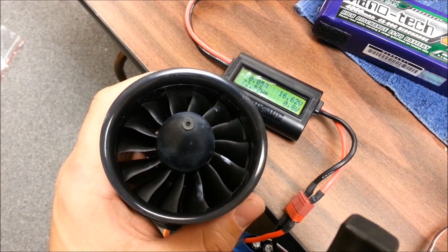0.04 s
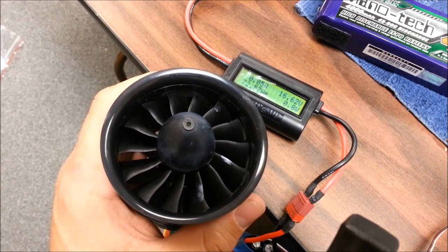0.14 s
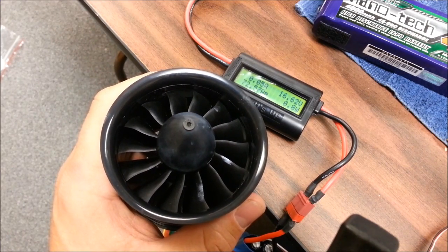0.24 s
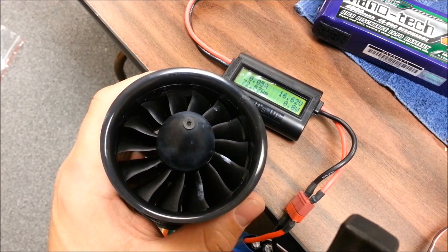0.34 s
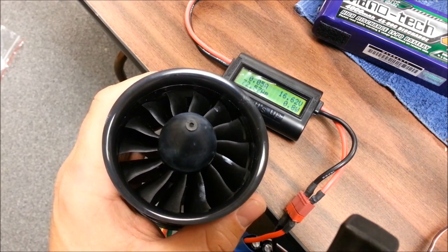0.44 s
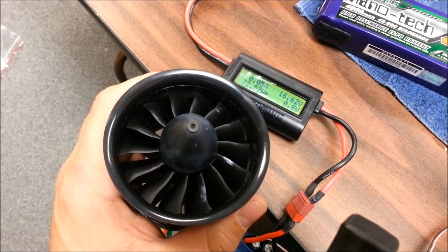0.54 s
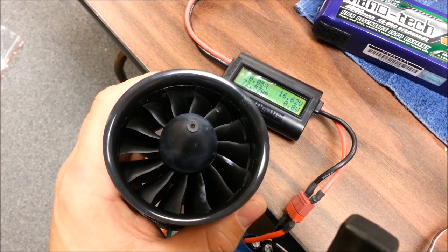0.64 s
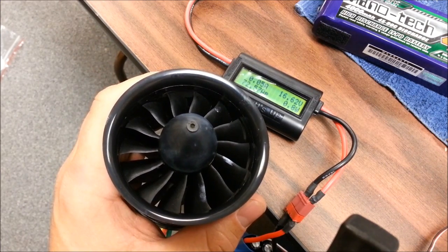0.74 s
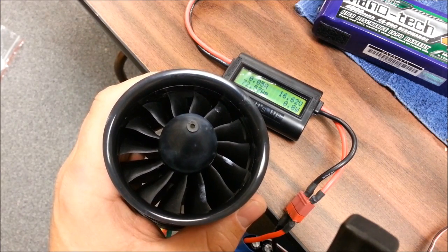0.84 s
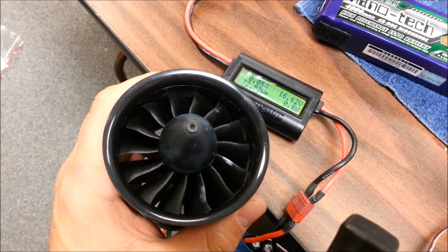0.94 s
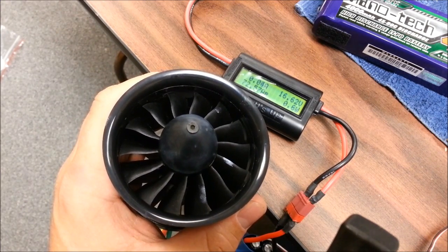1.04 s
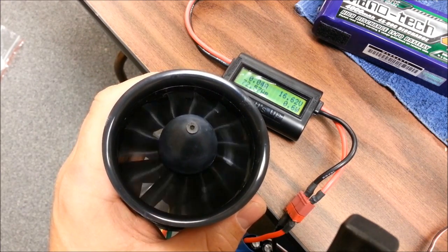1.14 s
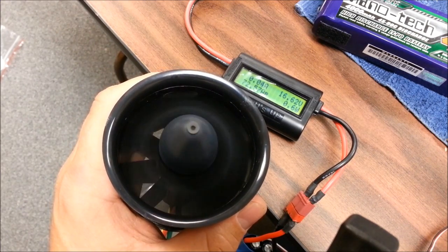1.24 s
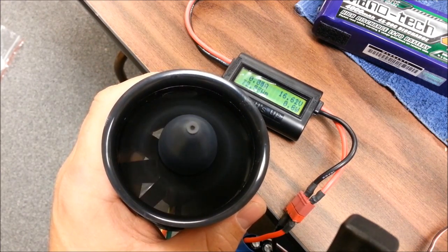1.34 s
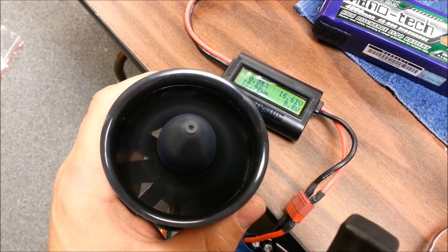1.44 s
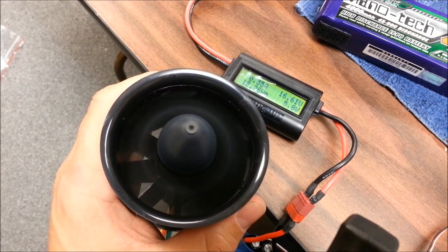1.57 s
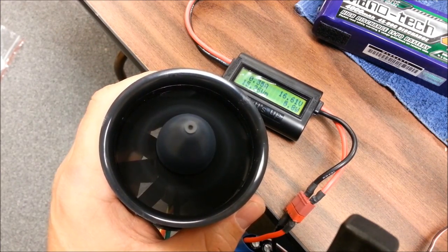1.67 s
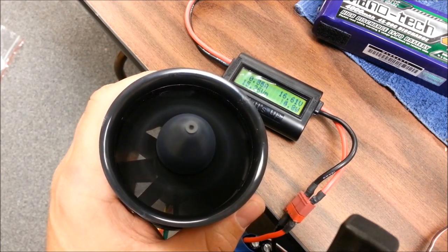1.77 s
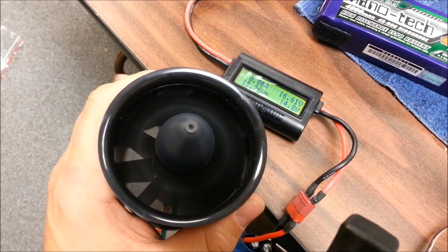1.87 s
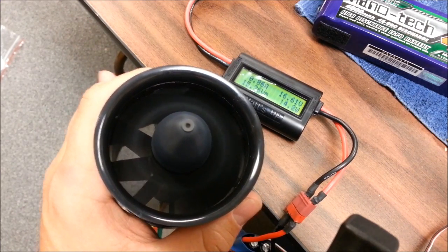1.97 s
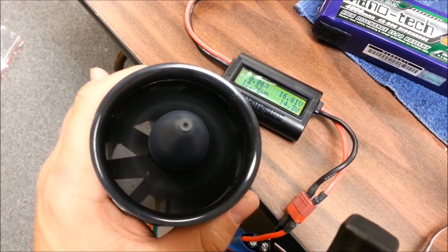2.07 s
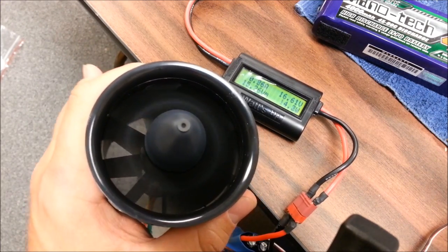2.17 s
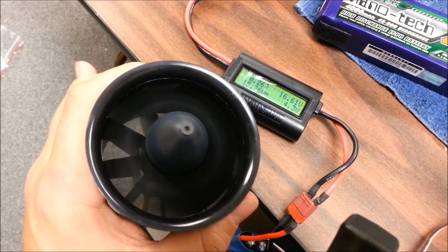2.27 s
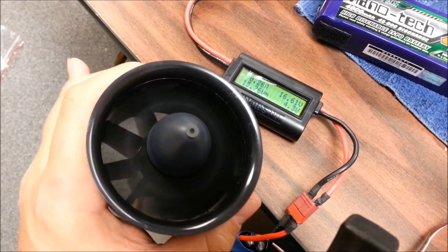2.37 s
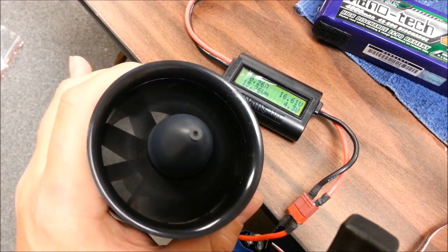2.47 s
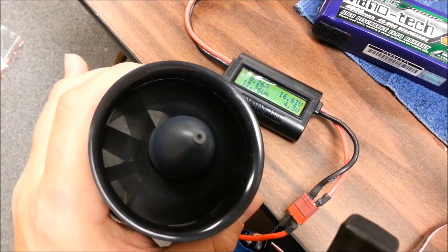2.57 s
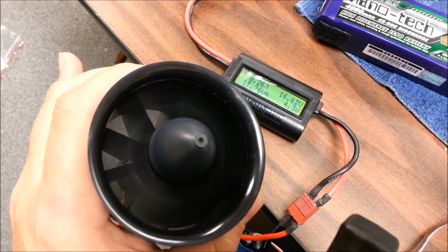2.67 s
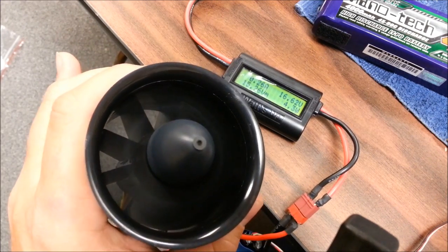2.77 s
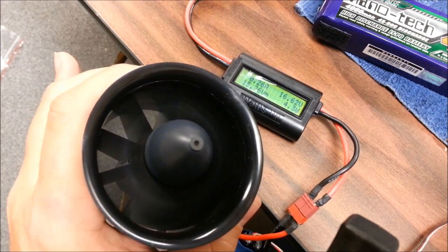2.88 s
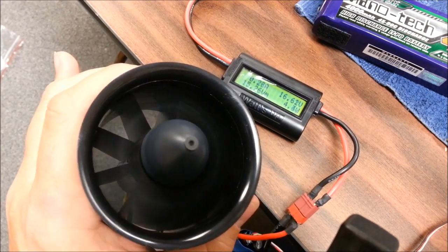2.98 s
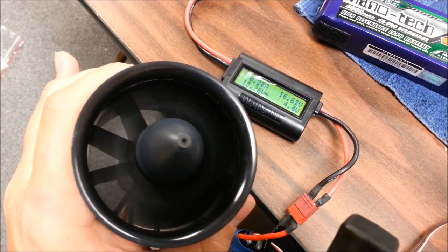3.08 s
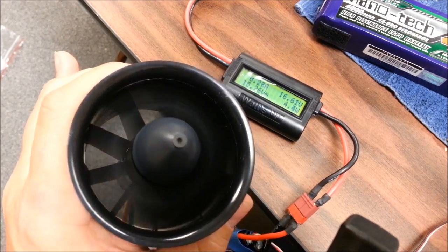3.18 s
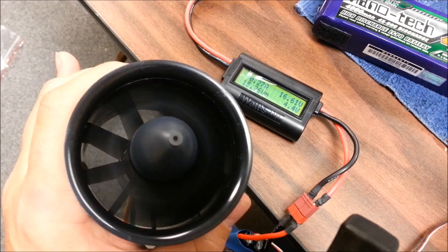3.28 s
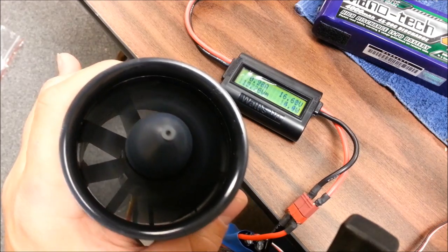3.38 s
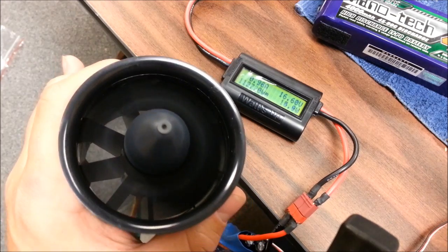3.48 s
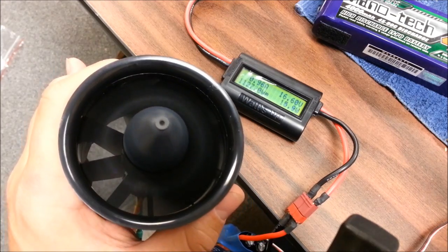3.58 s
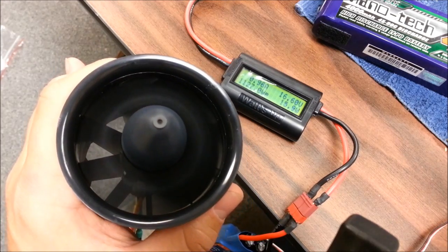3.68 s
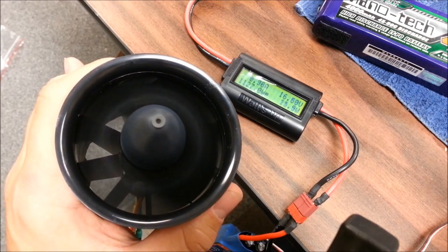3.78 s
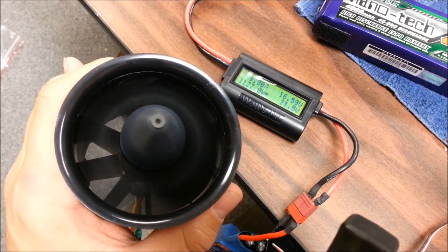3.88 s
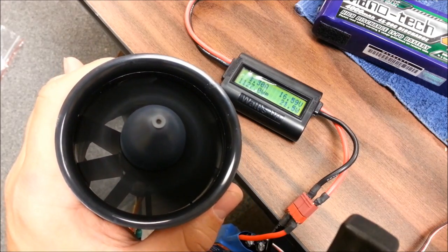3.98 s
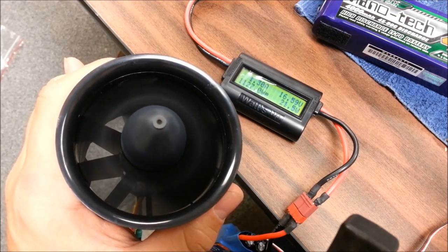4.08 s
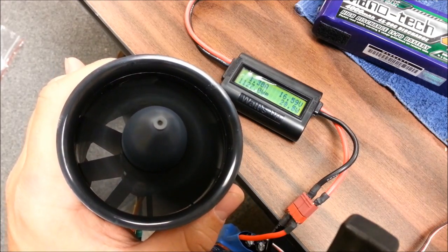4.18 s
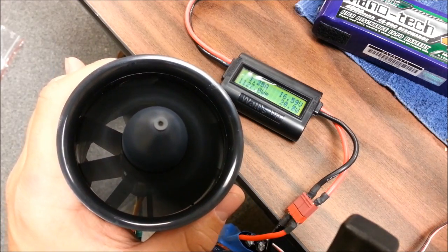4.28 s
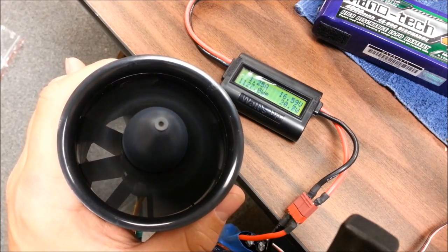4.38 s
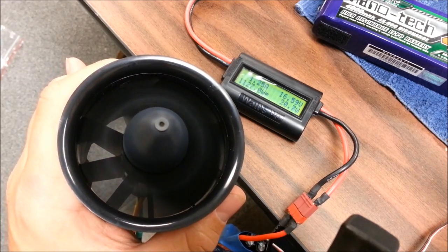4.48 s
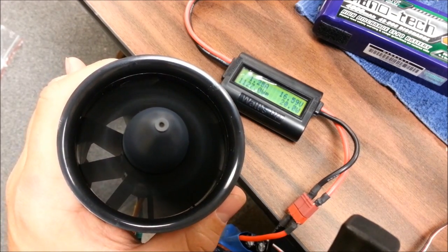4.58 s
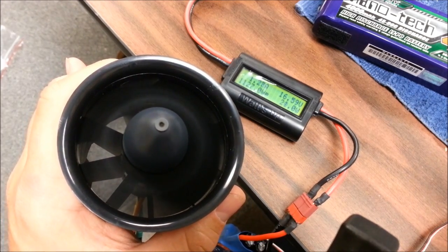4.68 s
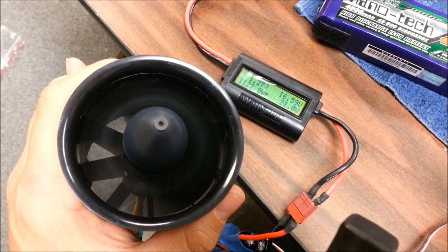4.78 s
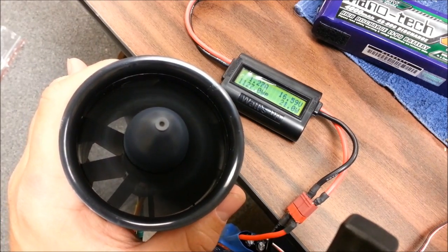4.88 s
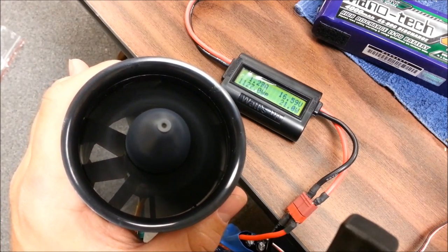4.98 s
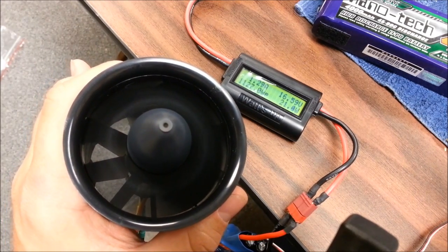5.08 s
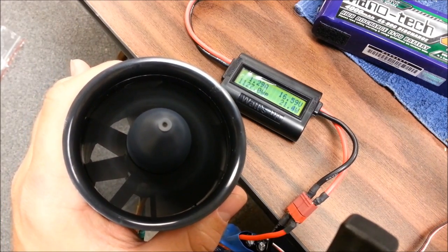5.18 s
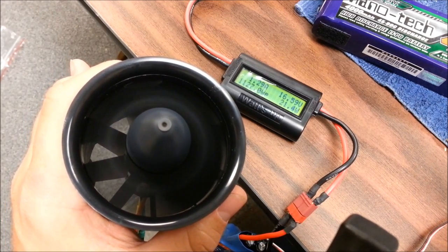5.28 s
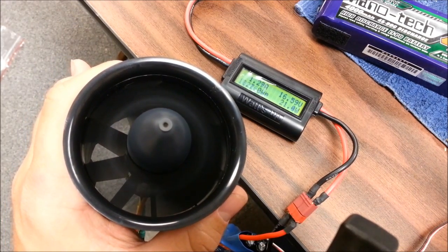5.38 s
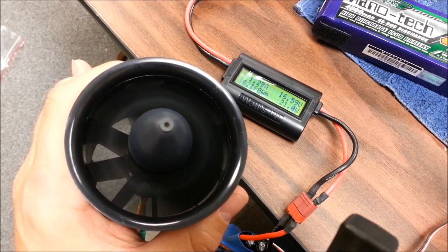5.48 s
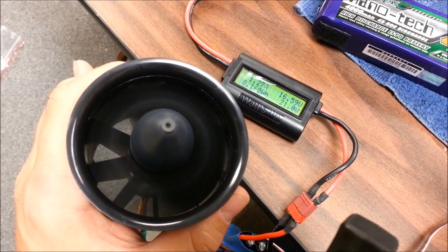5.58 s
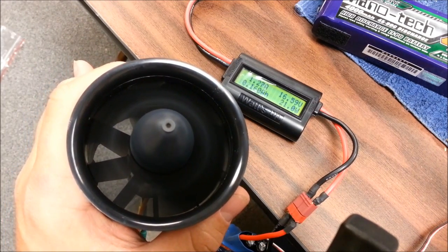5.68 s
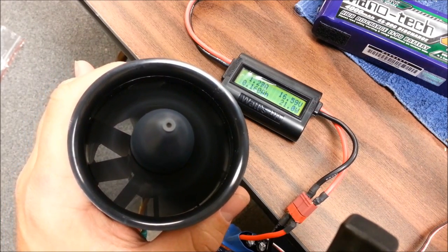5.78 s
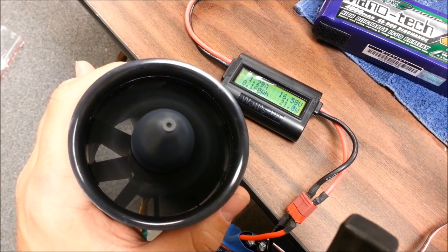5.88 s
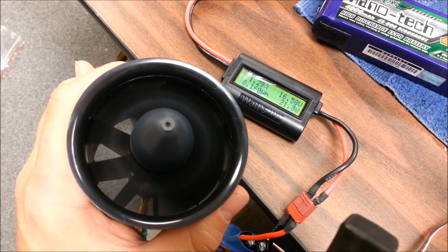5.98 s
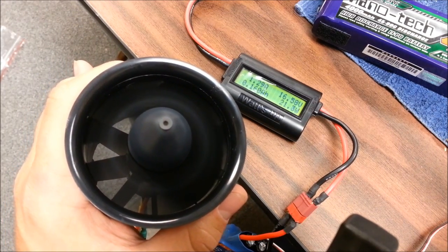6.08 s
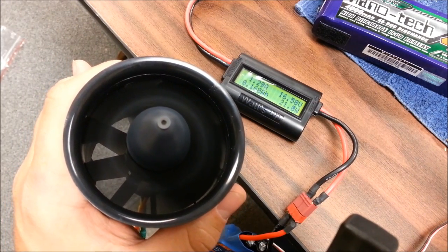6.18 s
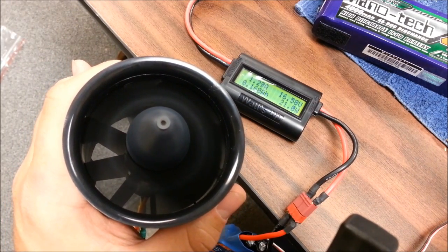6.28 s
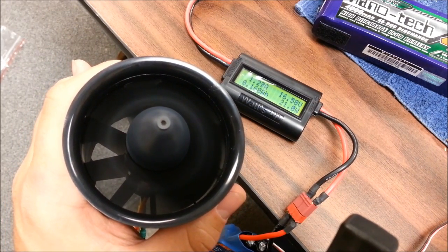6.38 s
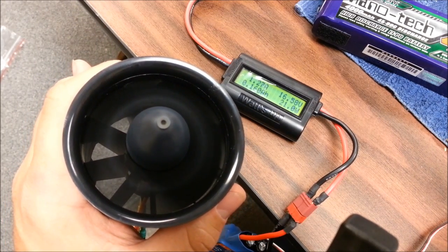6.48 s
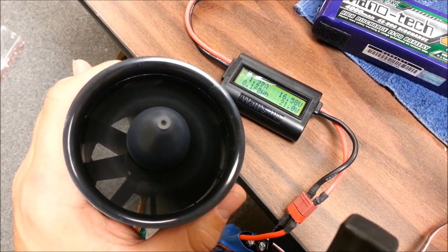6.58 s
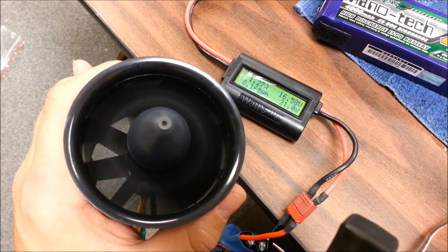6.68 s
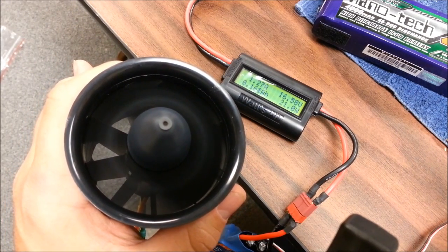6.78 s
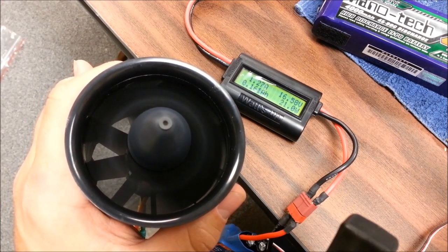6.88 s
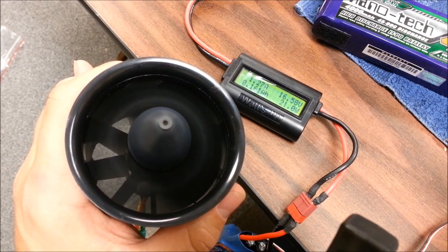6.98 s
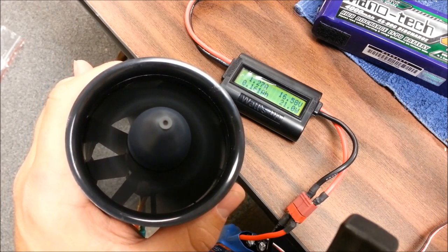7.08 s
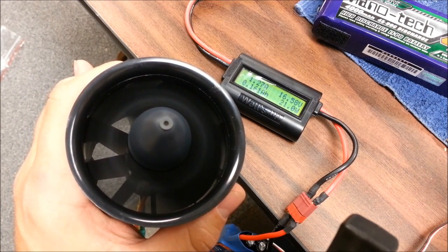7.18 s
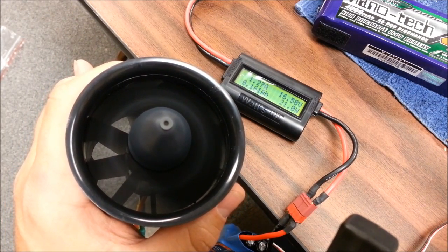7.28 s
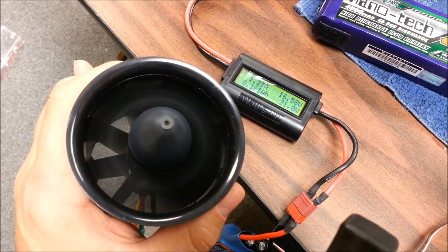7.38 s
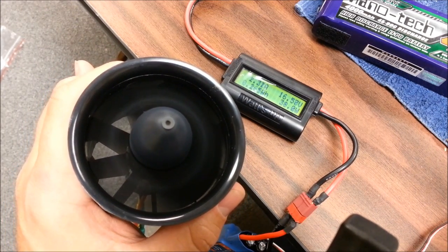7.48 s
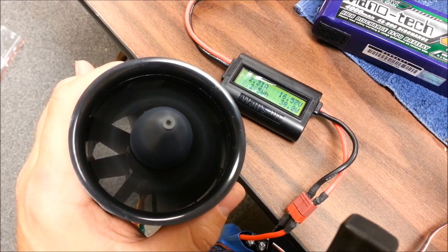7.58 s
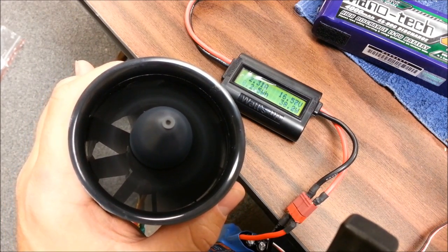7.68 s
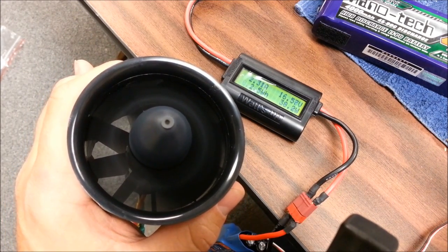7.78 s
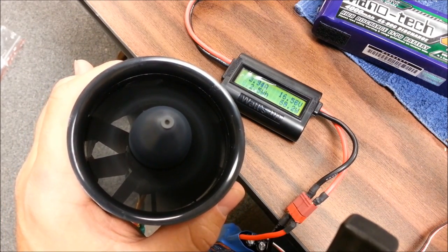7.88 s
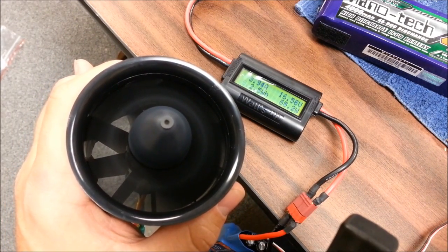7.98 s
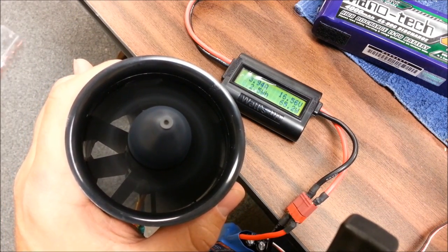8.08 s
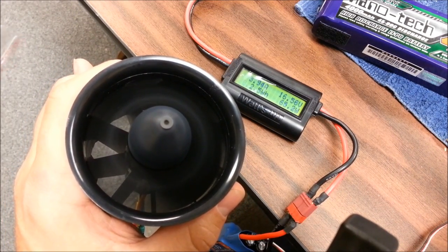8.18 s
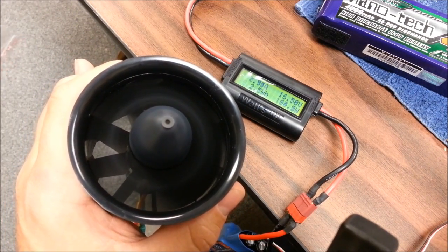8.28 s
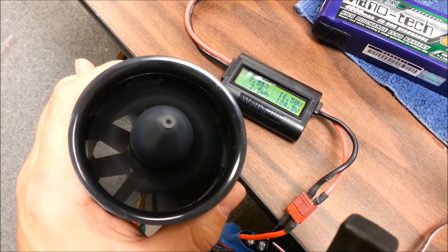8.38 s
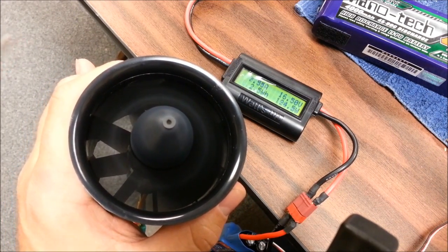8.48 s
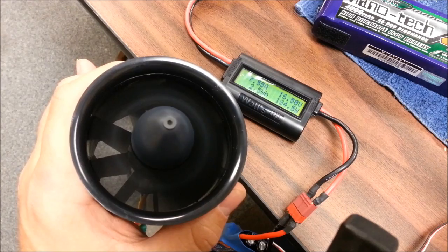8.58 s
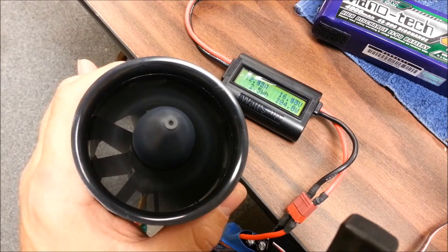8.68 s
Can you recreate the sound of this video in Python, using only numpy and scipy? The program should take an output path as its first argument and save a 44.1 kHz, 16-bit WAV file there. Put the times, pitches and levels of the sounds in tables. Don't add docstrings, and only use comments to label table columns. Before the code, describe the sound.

For the first 1.2 s there is only a quiet room: distant ventilation wash and a faint low hum. At 1.2 s a small electric ducted fan, held close, stutters alive with a cluster of tiny rattling ticks, then a sharper kick near 1.45 s with a short bench thump. A thin high electronic squeal joins. The whine sags through 2 s to a soft idle, briefly weaker around 2.4-2.7 s. From 3.05 s it glides up, settling by about 3.6 s into a steady, slightly wavering metallic whine with buzzing overtones, airy hiss and dull rumble. It holds until 7 s, then climbs in steps, air rush brightening and blade tone growing piercing. After 8 s it surges into a loud, shrill roar, still rising when it stops at about 8.7 s, without spinning down. The close stereo camera microphone turns itself down as the fan grows loud.

```python
import sys
import numpy as np
from scipy import signal
from scipy.fft import rfft, irfft, next_fast_len
from scipy.io import wavfile
from scipy.ndimage import uniform_filter1d

SR = 44100
rng = np.random.default_rng(int(sys.argv[2]) if len(sys.argv) > 2 else 0)


def generate_wav(sig):
    pcm = np.round(np.clip(np.atleast_2d(sig).T, -1, 1) * 32767).astype(np.int16)
    wavfile.write(sys.argv[1], SR, pcm)


def field_ratio(decibels):
    return 10 ** (np.asarray(decibels, dtype=float) / 20)


N = 385434
HOP = 64
STEADY = 133
CHOP_S = 1.45

# f/Hz, level/dB per Hz
ROOM_WASH = [(25, -30), (60, -34), (100, -11), (140, -12.5), (190, -11), (240, -2), (350, -13.5), (520, -6),
             (750, -14.5), (1400, -17), (2500, -18), (6000, -30), (9000, -29), (14400, -29.5)]
# f/Hz, likeness/0..1, left minus right level/dB
ROOM_PORTS = [(60, .5, -19), (130, 0.54, 1), (300, 0.72, -1.5), (700, 0.19, -2.5), (1300, .4, 0.5),
              (2600, 0.26, 0.5), (5000, 0.036, 0.5)]
# f/Hz, level/dB per Hz, growth/dB per dB of rush
DUCT_RUSH = [(444, -24.5, 1), (886, -11, 0.01), (1555, -5.5, 0.9534), (2570, 2, 0.89), (2940, -3.5, 0.9663),
             (3270, 4, 1.0), (4445, -1, 1.1939), (5560, -8.5, 1.19), (6400, -10.5, 1.22),
             (9200, -12.5, 1.3463), (11500, -15, 1.4355), (14200, -17.5, 1.47)]
# f/Hz, level/dB per Hz
BENCH_RUMBLE = [(90, -31), (170, -10), (300, -2.5), (520, -9), (900, -2), (1500, -2.5), (2500, -41)]
# f/Hz, likeness/0..1, left minus right level/dB
AIR_PORTS = [(300, 0.46, 0), (1000, 0.84, -2), (2130, 0.071, -0.5), (3340, 0.23, -0.5), (4860, 0.28, 2),
             (7000, 0.023, -5), (14000, .05, -6)]
DRIVE_PORTS = [(-13.5,), (1,)]
# t/s, speed/shaft turns per s
THROTTLE = [(1.182, 117.5), (1.433, 104.4), (1.467, 198.9), (1.503, 84.5), (1.86, 70.4), (2.29, 62.5),
            (3.034, 62.5), (3.046, 100), (3.18, 133.0), (6.949, 132.75), (7.092, 154.5), (7.141, 180.4),
            (7.44, 181.1), (7.53, 207.9), (7.861, 243.4), (8.058, 297.9), (8.213, 304.0), (8.74, 373.6)]
# t/s, blow level/dB
ROTOR_JERKS = [(1.177, -29.5), (1.184, -38), (1.194, -28), (1.214, -36), (1.222, -36), (1.231, -20),
               (1.241, -27), (1.247, -32), (1.254, -34), (1.260, -22), (1.270, -44), (1.282, -20.5),
               (1.305, -21.5), (1.318, -35), (1.453, -8), (1.462, -14), (1.468, -12)]
# speed/shaft turns per s, magnet order 12 level/dB, magnet order 24 level/dB,
# blade order 14 level/dB, blade order 28 level/dB
TONE_LEVELS = [(50.6, -59, -54, -68, -62), (64.1, -51, -41, -53.5, -55), (73.7, -49, -38, -50, -48),
               (85.6, -40.5, -33.5, -52, -41), (103, -38.5, -47, -46, -39), (116, -38, -43, -47, -29),
               (137, -31.5, -34, -35.5, -32), (137.6, -30, -32, -39, -27), (156, -23.5, -45, -37, -25),
               (176, -24.5, -43, -35, -23), (202, -38, -45, -30.5, -21), (228, -32, -43, -25, -18),
               (258, -24, -41, -19, -16), (276, -21, -39, -21, -14), (299, -25, -38, -8.5, -13),
               (333.4, -24.5, -37, -8.5, -12), (348, -22, -35, -16, -10)]
# shaft order/multiple of turns, level/dB re order-24 force
UNEVEN_ORDERS = [(7, -21), (9, -20), (15, -42), (16, -37), (17, -16), (18, -18), (19, -13.5), (25, -12),
                 (27, -16), (29, -19), (30, -9.5), (31, -16), (34, -16)]
# f/Hz, width/Hz, level/dB
HOUSING_MODES = [(2011, 18.7, 28.5), (2500, 94, 4), (3336, 56, 12.5), (3420, 16, -0.5)]
# f/Hz, left minus right level/dB, lag of left/rad
TONE_PORTS = [(300, -1, .1), (910, -5, 0.29), (1180, 1, 0.94), (1656, 10, 1.82), (1780, -4.5, 2.9),
              (2120, -8, 2.08), (2470, 0, 0.69), (3090, -3, 1.87), (3245, 6.5, 2.87), (3660, -6, 5.4),
              (4540, 2, 4.9), (5800, -8, 8.8), (7500, -7.5, 9.1), (9800, -7, 7.3)]
# t/s, level/dB
CAMERA_GAIN = [
    (7.28, 0.5),
    (7.34, -4.5),
    (7.5, 0.5),
    (7.7, 0),
    (8.0, -4),
    (8.25, -8),
    (8.55, -9),
    (8.74, -12.5),
]
# f/Hz, level/dB re treble of the moment
FAINT_LIMIT = [(50, -43.5), (150, -40), (250, -46), (500, -40), (1000, -55), (7000, -60), (8300, -42.5),
               (9600, -42.5), (10500, -50), (11500, -45), (14400, -44)]


def evened(x):
    return x / np.sqrt(np.mean(x ** 2) + 1e-20)


def columns(rows, at, warp=lambda v: v):
    key, *values = np.transpose(rows)
    return [np.interp(warp(at), warp(key), v) for v in values]


def log_hz(hz):
    return np.log(hz + 1)


def lagged(x, seconds):
    r = np.exp(-1 / (seconds * SR))
    return signal.lfilter([1 - r], [1, -r], x)


def resonate(x, hz, width):
    turn = np.exp(2j * np.pi * hz * np.arange(N) / SR)
    r = np.exp(-np.pi * width / SR)
    return 2 * (turn * signal.lfilter([1 - r], [1, -r], x / turn)).real


def waver(db, rate_hz=12., count=16):
    t = np.arange(N // HOP + 2) * HOP / SR
    hz = np.geomspace(rate_hz / 30, rate_hz, count)[:, None]
    slow = (np.sin(2 * np.pi * (hz * t + rng.random(hz.shape))) / hz ** 0.27).sum(0)
    return np.repeat(field_ratio(db * evened(slow)), HOP)[:N]


def tone(order, turns, waver_db, rate_hz=12.):
    phase = 2 * np.pi * (order * turns + rng.random())
    return np.sqrt(2) * waver(waver_db, rate_hz) * np.cos(phase)


def noise(field_db, pair, lag_s, patchy_db):
    hz = np.fft.rfftfreq(1024, 1 / SR)
    a, b, c, d, patches = np.moveaxis(rng.standard_normal((N // 256 + 5, 513, 5)), 2, 0)
    patches = evened(uniform_filter1d(uniform_filter1d(patches, 10, 0), 10, 1))
    same, pan_db = columns(pair, hz, log_hz)
    same = np.clip(same, 0, 1)
    right = a + 1j * b
    shared = same * right * np.exp(-2j * np.pi * hz * lag_s)
    left = shared + np.sqrt(1 - same ** 2) * (c + 1j * d)
    z = np.array([left * field_ratio(pan_db / 2), right / field_ratio(pan_db / 2)])
    z = z * field_ratio(field_db + patchy_db * patches)
    return signal.istft(np.swapaxes(z, 1, 2), nperseg=1024, noverlap=768)[1][:, :N]


def room():
    hum_hz, hum_db, wash_db = 129.8, -59, -51.5
    wash = noise(columns(ROOM_WASH, np.fft.rfftfreq(1024, 1 / SR), log_hz)[0], ROOM_PORTS, 0.00035, 1.0)
    unsteady = resonate(rng.standard_normal(N), hum_hz, 11.0)
    hum = evened(unsteady + 0.045 * np.sin(2 * np.pi * hum_hz * np.arange(N) / SR))
    return field_ratio(wash_db) * evened(wash) + field_ratio(hum_db) * hum * field_ratio(0) * np.array([[1.0], [-1.0]]) * field_ratio(
        [[1.0], [-1.0]]) / np.array([[1.0], [-1.0]])


def flow(speed, push):
    push = lagged(push, 0.046)
    decades = np.log10(speed / STEADY)
    buzz = field_ratio(-48) * np.minimum(speed / 35, 1) ** 1.5
    wake = field_ratio(-47.5 + 55.9 * decades)
    rumble_db = 10 * np.log10(buzz ** 2 + wake ** 2) + 8 * push
    rush_db = -29 + 45.85 * decades + 4.5 * push
    return rumble_db, rush_db


def air(rumble_db, rush_db):
    hz = np.fft.rfftfreq(1024, 1 / SR)
    at = np.minimum(np.arange(N // 256 + 5) * 256, N - 1)
    rumble_db, rush_db = rumble_db[at, None], rush_db[at, None]
    shape_db, growth = columns(DUCT_RUSH, hz, log_hz)
    rush = field_ratio(shape_db + growth * (rush_db + 29) - 45.5)
    rumble = field_ratio(columns(BENCH_RUMBLE, hz, log_hz)[0] + rumble_db - 10.5)
    return noise(10 * np.log10(rush ** 2 + rumble ** 2), AIR_PORTS, 0.00017, 1.0)


def chop(turns, speed, push, coast):
    hz = 7810.5 - 0.255 * speed
    db = -31 + 12.3 * np.log10(speed / STEADY) + 10 * push - 9.5 * coast
    commutation = 1 + 0.077 * np.cos(2 * np.pi * 4 * turns)
    on = np.clip((np.arange(N) / SR - CHOP_S) / 0.0076, 0, 1)
    left, right = on * commutation * field_ratio(db) * tone(1, np.cumsum(hz) / SR, 0.65) * field_ratio(DRIVE_PORTS)
    return np.array([np.roll(left, 6), right])


def floating():
    t = np.arange(N) / SR
    return uniform_filter1d(1. * (t > 2.38) * (t < 2.69), size=1500)


def rotor():
    full_push, full_coast = 30.4, 8.2
    s, asked = np.transpose(THROTTLE)
    asked = np.interp(np.arange(N) / SR, s, asked, left=0) + 1.5 * floating()
    speed = lagged(asked, 0.17) + 1e-3
    gap = asked - speed
    push = np.tanh(np.maximum(gap, 0) / full_push)
    coast = np.tanh(np.maximum(-gap, 0) / full_coast)
    return speed, push, coast


def jerk_blows():
    s, blow_db = np.transpose(ROTOR_JERKS)
    blows = np.zeros(N)
    blows[(s * SR).astype(int)] = field_ratio(blow_db - 3.0)
    return blows, signal.lfilter([1], [1, -np.exp(-1 / (0.0046 * SR))], blows)


def housing(force, rush):
    blows, shudder = jerk_blows()
    grit = (field_ratio(-33) * rush ** 0.36 + shudder) * rng.standard_normal(N) + 0.97 * blows
    grit = signal.sosfilt(signal.butter(2, (1600, 3900), "band", fs=SR, output="sos"), grit)
    ring = sum(field_ratio(db) * resonate(force + grit, hz, width) for hz, width, db in HOUSING_MODES)
    rattle = resonate(shudder * rng.standard_normal(N), 3300, 260)
    return ring + field_ratio(11.5) * resonate(rattle, 3300, 260)


def whine(speed, push, rush, driven):
    levels = field_ratio(columns(TONE_LEVELS, speed))
    slow_start = np.minimum(speed / TONE_LEVELS[0][0], 1) ** 2
    pull12, pull24, blade14, blade28 = levels * slow_start * driven
    blade28 = blade28 * field_ratio(3.5 * push)
    turns = np.cumsum(speed * waver(0.00603, 8.)) / SR

    pull6 = pull12 * field_ratio(-0.5) * np.minimum(speed / 315, 1) ** 6.0
    force = pull6 * tone(6, turns, 2.7) + pull12 * tone(12, turns, .8)
    force = force + field_ratio(0.5) * pull24 * tone(24, turns, 0.96)
    force = force + field_ratio(-31) * pull24 * tone(32, turns, 2.2)

    low_blades = tone(14, turns, 3.6, 30.) + field_ratio(-9.5) * speed / 260 * tone(10, turns, 2.8, 25.)
    overtones = field_ratio(-15) * speed / 300 * tone(42, turns, 3.0) + field_ratio(-31) * tone(50, turns, 3.5)
    high_blades = tone(28, turns, 1.07) + overtones
    blades = blade14 * low_blades + field_ratio(-1.0) * blade28 * high_blades

    loaded = np.minimum(speed / STEADY, 1) ** 1.6
    uneven = pull24 * loaded * sum(field_ratio(db) * tone(k, turns, 3.7) for k, db in UNEVEN_ORDERS)
    return force + housing(force, rush) + blades + uneven, turns


def to_ports(x):
    size = next_fast_len(N + 4096)
    pan_db, lag = columns(TONE_PORTS, np.fft.rfftfreq(size, 1 / SR), log_hz)
    share = 1 / (1 + field_ratio(-2 * pan_db))
    paths = np.array([np.sqrt(2 * share) * np.exp(-1j * lag), np.sqrt(2 - 2 * share)])
    return irfft(rfft(x, size) * paths, size)[:, :N]


def scene():
    cut_s, back_s = 1.476, 1.545
    t = np.arange(N) / SR
    speed, push, coast = rotor()
    cut = uniform_filter1d(1. * (t > cut_s) * (t < back_s), size=200)
    rumble_db, rush_db = flow(speed, push * (t > CHOP_S))
    rumble_db = rumble_db + 7.5 * (t > cut_s) * np.exp(-abs(t - cut_s) / 0.3)
    driven = field_ratio(-9 * cut - 6 * floating())
    tones, turns = whine(speed, push, field_ratio(rush_db), driven)
    drive = chop(turns, speed, push * (1 - cut), np.maximum(coast, cut))
    return room() + air(rumble_db, rush_db) + drive + to_ports(tones)


def top_cut(x):
    return signal.sosfilt(signal.butter(12, 14420, fs=SR, output="sos"), x)


def record(dry):
    edge_hz, treble_hz = 14450, 2600
    leveled = dry * field_ratio(columns(CAMERA_GAIN, np.arange(N) / SR))
    lowpass = signal.firwin(511, edge_hz, window=("kaiser", 9), fs=SR)
    limited = signal.oaconvolve(leveled, lowpass[None], "same")
    hz, _, z = signal.stft(np.clip(limited, -1, 1), SR, window="cosine", nperseg=2048)
    power = abs(z) ** 2
    treble = power[:, hz > treble_hz].sum(1, keepdims=True)
    limit = treble * field_ratio(2 * columns(FAINT_LIMIT, hz, log_hz)[0])[:, None]
    heard = uniform_filter1d(power, size=3, axis=1) > limit
    kept = signal.istft(z * heard, SR, window="cosine", nperseg=2048)[1][:, :N]
    return top_cut(np.clip(kept, -1, 1))


dry = scene()
out = record(dry)
generate_wav(out)
```